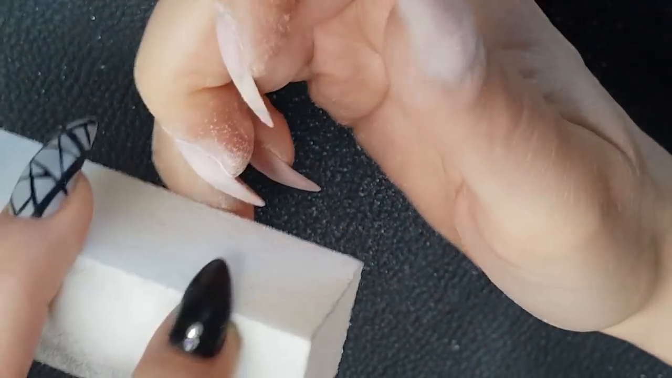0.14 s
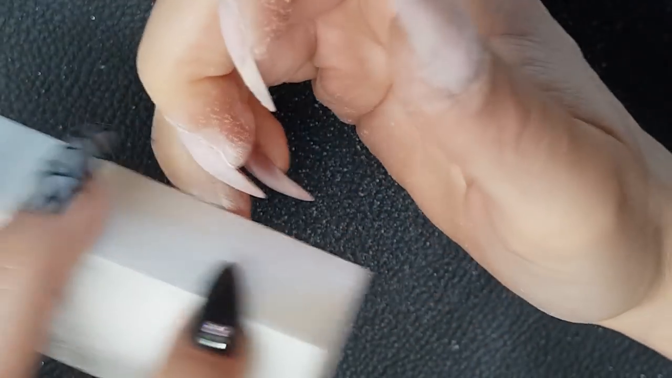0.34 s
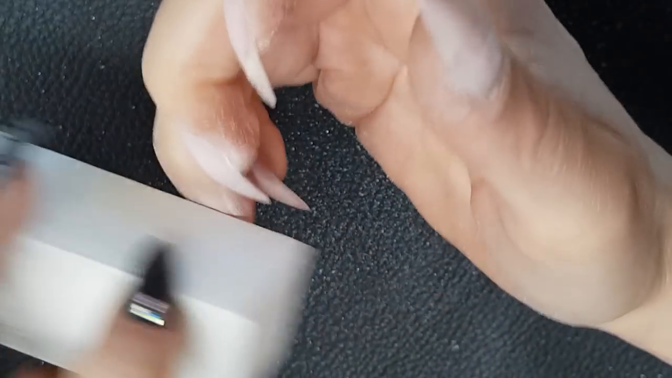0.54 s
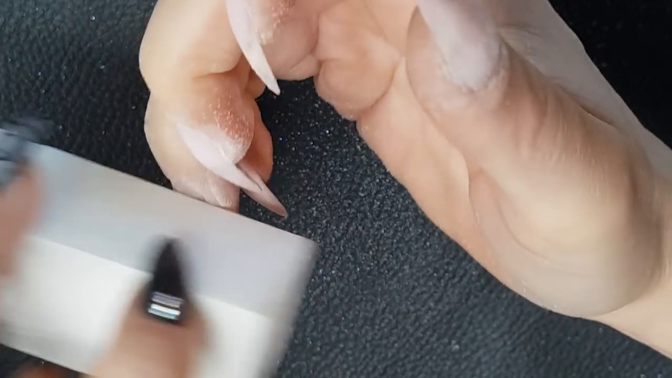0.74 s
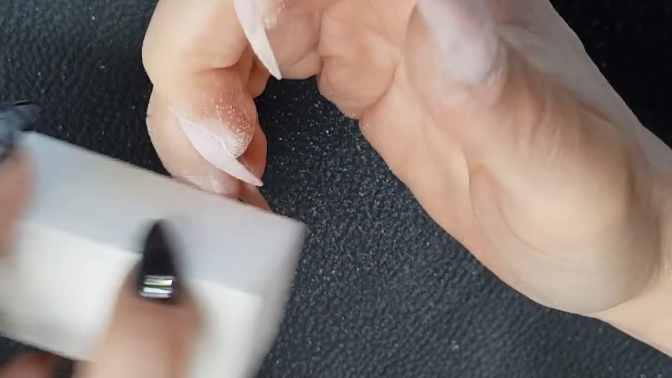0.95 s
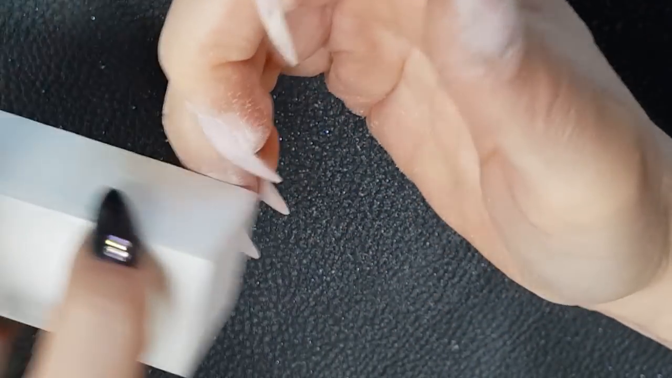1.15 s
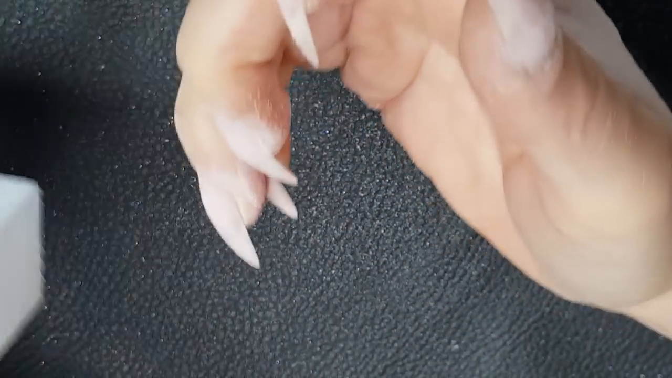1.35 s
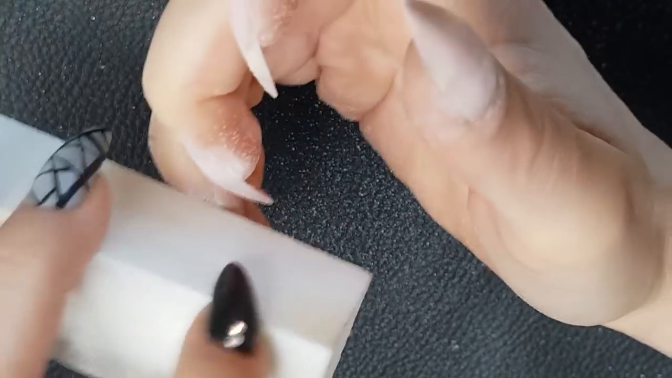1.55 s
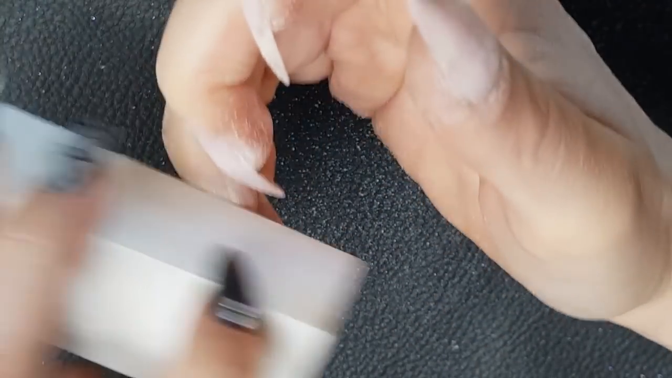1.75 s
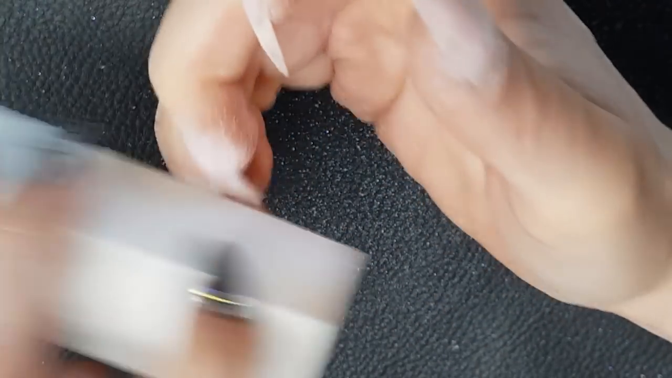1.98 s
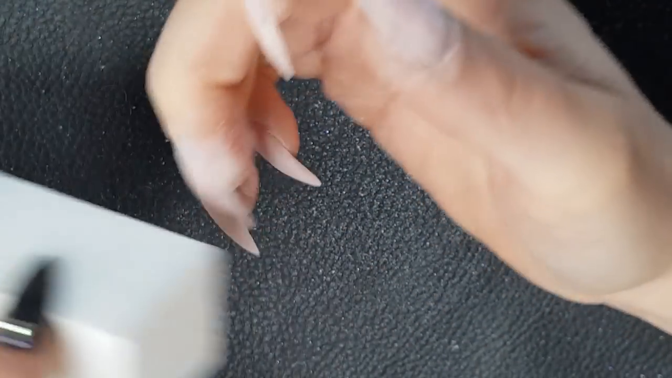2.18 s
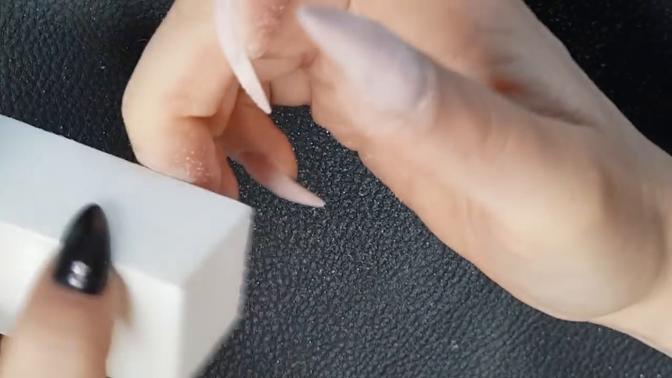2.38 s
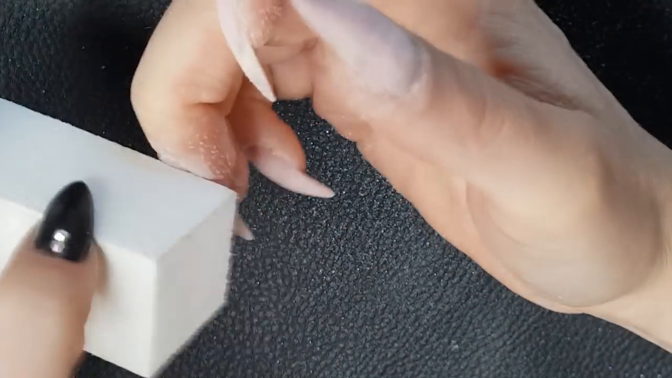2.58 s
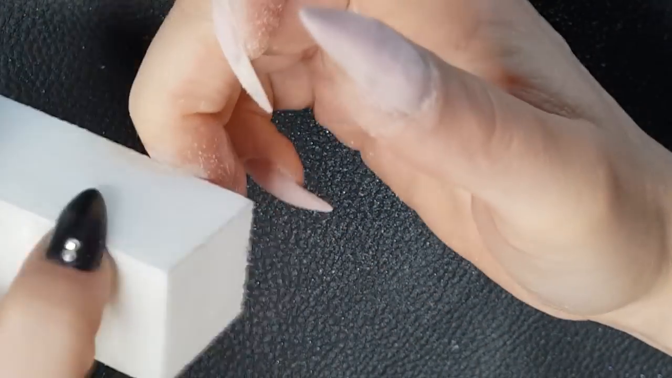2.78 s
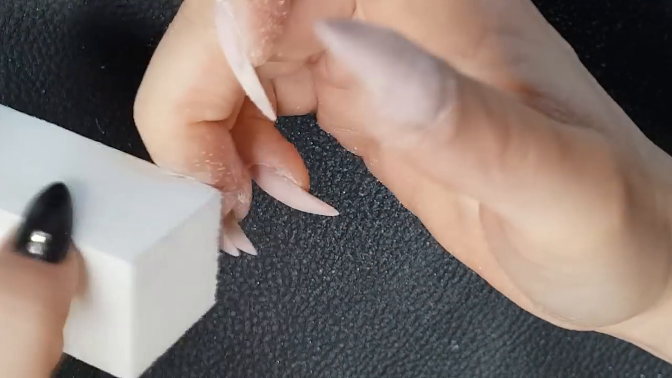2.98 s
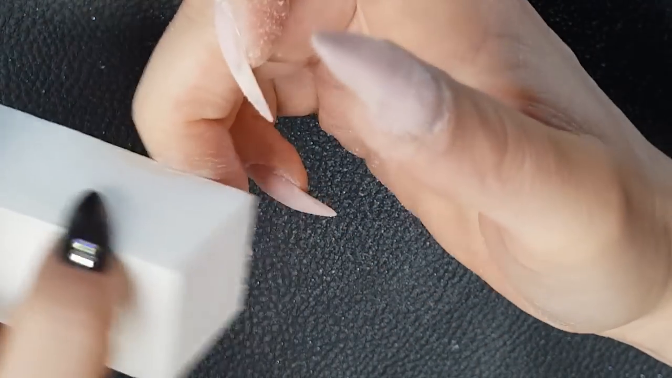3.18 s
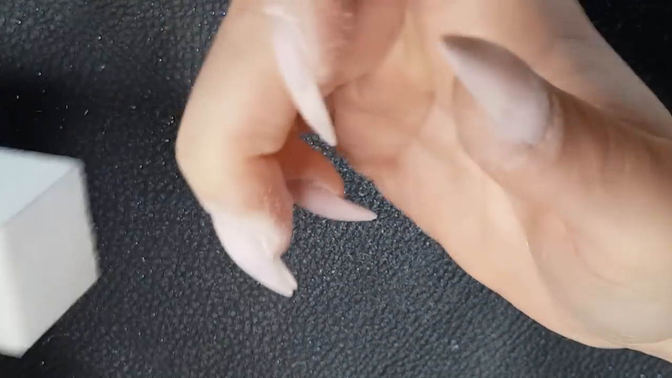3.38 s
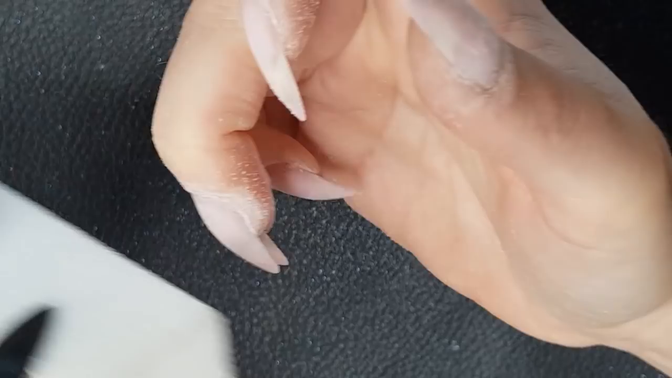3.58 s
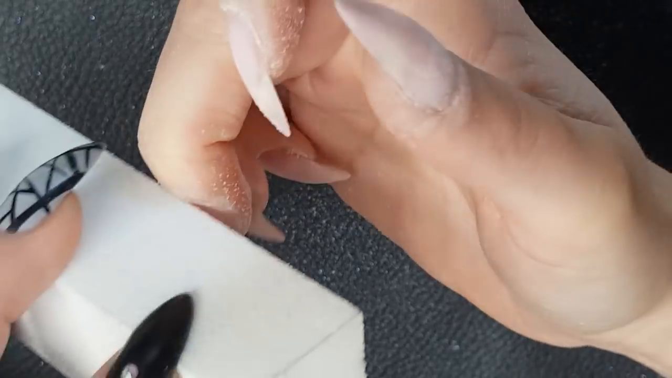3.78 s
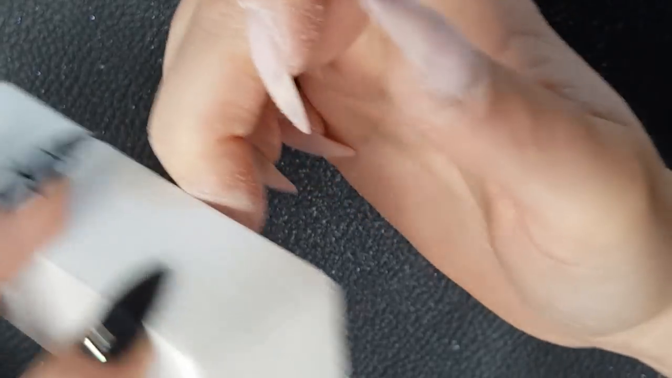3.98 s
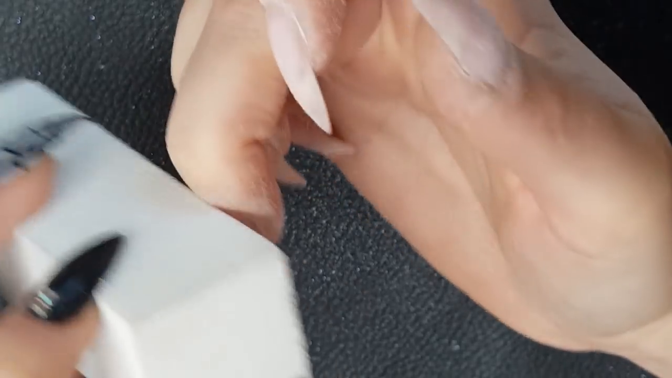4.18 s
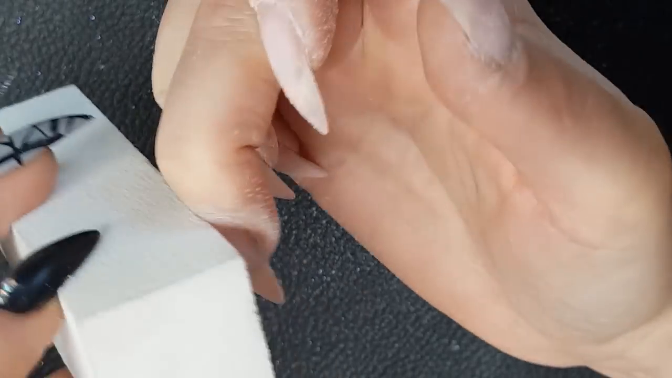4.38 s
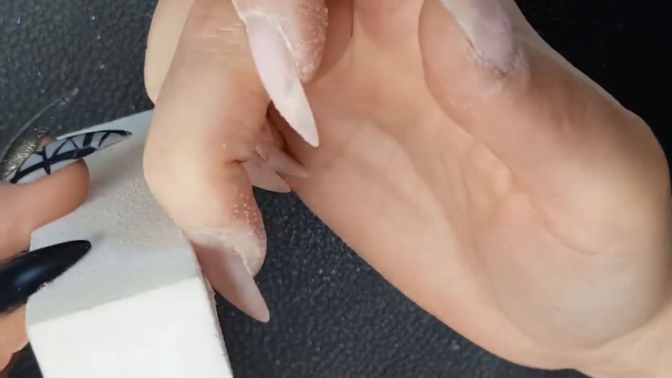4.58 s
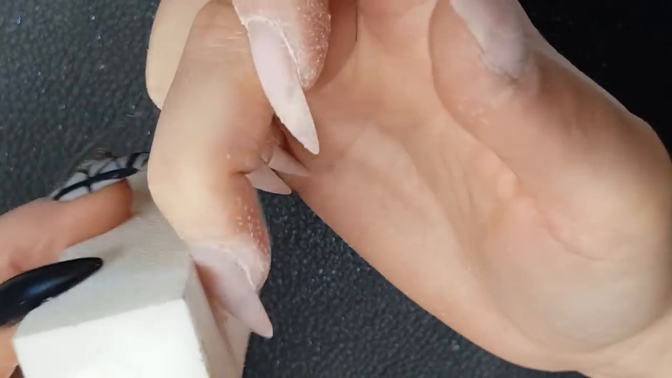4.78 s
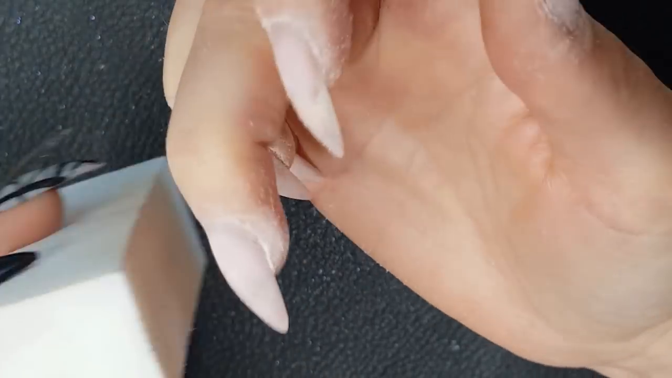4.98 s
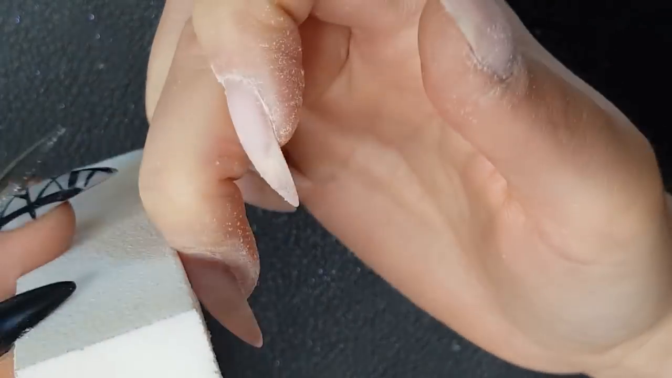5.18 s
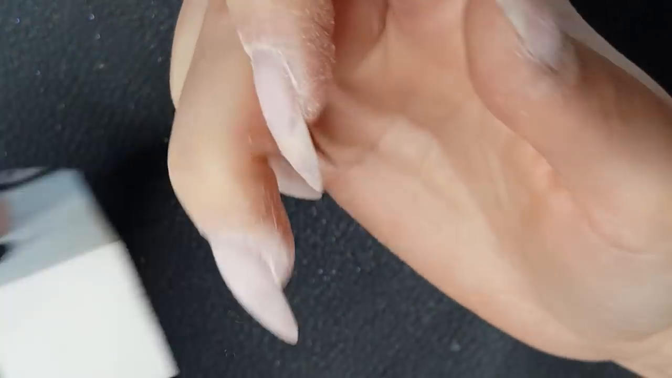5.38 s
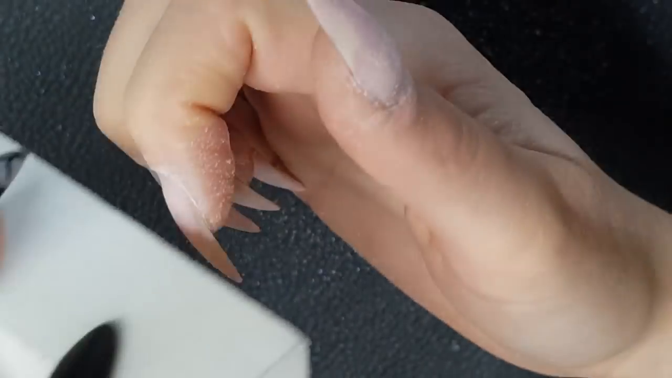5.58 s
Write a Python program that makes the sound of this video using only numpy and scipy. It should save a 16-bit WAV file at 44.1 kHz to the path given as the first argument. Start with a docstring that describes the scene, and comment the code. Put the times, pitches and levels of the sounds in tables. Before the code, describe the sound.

Dry, hissy sanding strokes on fingernails, very near the microphone. A first steady run of rasps stops, a shorter and brighter burst follows, then two more even runs, the last ending in a drawn-out, more nasal scrape. After a gap comes one final rasp and tiny faint brushes. Quiet airy hum fills the small room's pauses.

```python
"""In a small room with ventilation, a gritty foam block is rubbed to and fro over long fingernails, close to a
two-port microphone. Each stroke is a dense rasp: random grains of grit ring the nail, finger and block. Faint
brushes of the block fall between strokes. The room answers with a short tail of echoes. The ventilation is air
noise over a low hum, both made of filtered noise; the background level wavers, air and hum together."""
import sys
import numpy as np
from scipy import signal
from scipy.fft import rfft, irfft
from scipy.io import wavfile
from scipy.ndimage import uniform_filter1d

SR = 44100
rng = np.random.default_rng(int(sys.argv[2]) if len(sys.argv) > 2 else 0)


def inscribe(sig):
    """Save sig as 16-bit PCM at rate SR to the path in sys.argv[1].

    A 1-D sig is mono; a 2-D sig holds one channel per row.
    Samples are clipped to [-1, 1] before scaling.
    """
    pcm = np.round(np.clip(np.atleast_2d(sig).T, -1, 1) * 32767)
    wavfile.write(sys.argv[1], SR, pcm.astype(np.int16))


N = 248600  # length of the scene in samples

# Ring widths below are taken where the power has dropped to a quarter.
# Air noise colour: (frequency [Hz], relative level per Hz [dB])
AIR_COLOUR = [(30, -74), (100, -24), (165, -19), (330, -29.5), (400, -25.5), (480, -16), (632, -18.5),
              (1160, -23.5), (1350, -33.5), (1600, -34), (2480, -41), (4910, -46), (12300, -53.5),
              (16000, -60)]
# How alike the air noise is left and right: (frequency [Hz], likeness [0 to 1])
AIR_LIKENESS = [(60, 0.63), (180, 1), (550, 0.92), (1650, 0.24), (4970, 0.28), (15000, 0.36)]
# Resonances of the duct: (frequency [Hz], width [Hz], relative power [dB])
DUCT_RINGS = [(234.1, 20.5, 1), (273.1, 65.4, -2), (170.5, 28, -15), (456.8, 9.7, -12), (543, 91, -12)]
# Background level over time: (time [s], hum level [dB])
BACKGROUND_LEVEL = [(0.0, -55.5), (0.03, -58), (3.56, -56.5), (3.86, -64.5), (4.09, -56), (5.0, -54.5),
                    (5.1, -61), (5.6, -57), (5.63, -63)]
# Light brushes against skin or nail: (time [s], length [s], level [dB], ring [Hz], ring width [Hz])
BRUSH_EVENTS = [(0.021, 0.066, -81, 3200, 900), (0.159, 0.016, -78, 4830, 1200),
                (1.579, 0.058, -67, 5500, 905), (1.592, 0.049, -77, 7600, 400),
                (5.195, 0.048, -79.5, 3460, 1500), (5.525, 0.0074, -68, 8810, 12000),
                (5.536, 0.018, -74, 9460, 6060), (5.551, 0.038, -79, 6000, 8050)]
# How alike the rasp is left and right: (frequency [Hz], likeness [0 to 1])
RASP_LIKENESS = [(700, 0.95), (2000, 0.96), (3500, 0.75), (6000, 0.56), (9000, 0.43), (15000, 0.65)]
# Dying away of the early room echoes: (frequency [Hz], time to fall 60 dB [s])
ROOM_DECAY = [(700, 0.17), (2000, 0.21), (4000, 0.24), (8000, 0.14), (15000, 0.15)]
# Strokes: (time [s], length [s], hiss level midway [dB], swell from early to late [dB],
#   arch of the middle over the ends [dB], hiss tilt [dB per octave, roughly],
#   nail tip ring [dB], finger ring [dB], block thud [dB]); the last three are relative to the hiss
STROKE_EVENTS = [(0.276, 0.056, -44.5, -2.5, 7, -0.5, -3, -4.5, -23.5),
                 (0.374, 0.052, -42.5, -1, 0, -2, -9.5, -3.5, -40),
                 (0.471, 0.086, -37, -8, 3.2, 2, -1, -7.5, -21),
                 (0.581, 0.076, -40, -5.5, 3, 1, -4, 0, -19),
                 (0.687, 0.053, -37, -3.5, 2, -1, -11, -4.5, -23),
                 (0.786, 0.055, -42, -6.5, 4, 0, -8, -3.5, -20),
                 (0.876, 0.058, -36, -1, 1.5, 1, -6.5, -7, -22),
                 (0.974, 0.044, -42.5, -1, 0.1, 0, -4, -4, -18.5),
                 (1.074, 0.077, -38, 4.5, 2.8, -1, -3.5, -8.5, -22),
                 (1.19, 0.032, -39, -13.5, 11, 0, -0.5, -5, -19),
                 (1.284, 0.038, -37.5, 5, 3.5, -11.5, -9, -12, -19.5),
                 (1.644, 0.1, -41.5, 2, 7.5, -1, -19, -11, -24.5),
                 (1.769, 0.073, -38, -4, 5, 6.5, -10, -3.5, -22.5),
                 (1.868, 0.07, -35.5, -6, 3.5, 5, -9.5, -8.5, -20.5),
                 (1.967, 0.045, -37, -2, 0, 8, -10, -13, -30),
                 (2.036, 0.051, -33, 1.5, 0, 1, -12, -10.5, -22.5),
                 (2.383, 0.06, -40.5, -2.5, 6.5, 0, -9.5, -5.5, -33),
                 (2.484, 0.056, -41, -1.5, 3.5, -3.5, -20, -2.5, -25),
                 (2.573, 0.064, -40.5, -1.5, -1, -4, -9, -4.5, -24),
                 (2.675, 0.086, -44.5, -19, 2, -3.5, -10.5, -4, -20),
                 (2.78, 0.057, -39.5, 3, 1.5, -2, -7.5, -7.5, -24),
                 (2.882, 0.046, -45.5, -6.5, 0.9, -3.5, -14, -4, -15),
                 (2.968, 0.071, -39, -3.5, 5.5, 0, -9, -6, -19),
                 (3.072, 0.049, -40.5, -7.5, 1, -2.5, -9.5, -5, -16.5),
                 (3.165, 0.049, -42, -2.5, 2, -0.5, -7.5, -14, -21),
                 (3.266, 0.021, -42, 3.5, 9.5, 5, -10.5, -15.5, -16.5),
                 (3.333, 0.045, -38.5, 7, -2.2, -3, -9.5, -5.5, -14),
                 (3.901, 0.075, -43, -3, 3.5, -4, -7, -7.5, -23.5),
                 (4.017, 0.051, -42, -4, 2.5, 0, -15, -2.5, -33),
                 (4.103, 0.074, -39.5, -1, 1, -2.5, -6.5, -4.5, -27),
                 (4.219, 0.076, -40.5, -1, 2.5, -2, -4.5, -11, -36.5),
                 (4.331, 0.076, -38.5, 0.5, 1.5, 0, -4.5, -9.5, -27),
                 (4.462, 0.056, -37.5, -3, 1, -1.5, -3, -6.5, -39.5),
                 (4.57, 0.073, -39, -0.5, 1.2, -3.5, -1, -3.5, -26),
                 (4.686, 0.057, -38, -4, 1, -3, -2.5, -4.5, -18.5),
                 (4.791, 0.15, -38.5, -7.5, 3, -7.5, 3.5, 0.5, -19.5),
                 (5.291, 0.071, -40, 7, 1.9, -3, 1.5, -2.5, -25)]
# How the block sits on the hand in each bout of strokes: (start [s], middle nail tip ring [Hz],
#   tip ring width [Hz], finger ring [Hz], growth of tip, finger and thud through the stroke [dB],
#   nail plate ring at -40 dB hiss [dB], block thud [Hz], left over right at -40 dB hiss [dB])
BLOCK_BOUTS = [(0.2, 2950, 800, 2200, 6.5, -0.5, 1220, 1.5), (1.6, 2870, 764, 2100, 6, -1, 1380, 0.6),
               (2.3, 2980, 830, 2230, 4, -2, 1190, 1.7), (3.8, 3340, 940, 2096, 3.5, -1.5, 1010, 1.4),
               (4.75, 3350, 725, 2010, 7, -0.5, 870, 0.5), (5.2, 3390, 810, 2020, 2, -0.5, 870, 1)]
# Hiss colour before bumps and tilt: (frequency [Hz], relative level per Hz [dB])
HISS_COLOUR = [(3240, -31), (5500, -11.5), (6850, -4), (8410, -1.5), (11500, -2), (13200, -2),
               (14800, -4.5), (16000, -12.5)]
# Bumps on the hiss: (frequency [Hz], width [Hz], height [dB]); here width is between the 1/e points of the bump
HISS_BUMPS = [(8100, 440, 0.5), (10420, 1400, 2), (12700, 810, 0)]
# Rings of the nail plate: (frequency [Hz], width [Hz], power weight)
PLATE_RINGS = [(4960, 2360, 0.55), (5020, 600, 0.092), (3800, 770, 0.11)]

AIR_DB = -63.5  # average level in dB
TREBLE_DROP_S = 0.055  # time after which the treble of the room tail drops further
FINGER_WIDTH_HZ, BLOCK_WIDTH_HZ = 900, 810
TIP_SCATTER = 0.015  # typical share by which the tip ring moves from stroke to stroke
PLATE_GROWTH_DB = 0.5  # from start to end of a stroke
# dB per dB of hiss under -40: lighter strokes ring the plate more and sit further left
LIGHT_PLATE, LIGHT_PAN = 0.66, 0.15
RISE_DB_PER_MS = 3.5
# a short stroke that starts soon after its bout does lands more softly
FIRST_S, FIRST_RISE_DB_PER_MS = 0.11, 2
FALL_S = 0.003  # time per 20 dB of fall after a stroke
EDGE_HZ = 15780  # upper edge of the treble


def gain_of(db):
    """Turn dB into an amplitude factor; twice the dB gives a power factor."""
    return 10 ** (np.asarray(db) / 20)


def evened(x):
    """Scale to an average power of 1."""
    return x / np.sqrt(np.mean(x ** 2) + 1e-20)


def read(points, hz):
    """Read a table between its points, along a log frequency scale."""
    f, value = np.transpose(points)
    return np.interp(np.log(hz + 1), np.log(f + 1), value)


def add(mix, s, sound):
    """Mix a sound in at its time, cutting what runs past the end."""
    part = mix[:, round(s * SR):][:, :sound.shape[1]]
    part += sound[:, :part.shape[1]]


def ring(hz, centre_hz, width_hz):
    """Power of a steep resonance over frequency, total 1."""
    power = 1 / (1 + (2 * (hz - centre_hz) / width_hz) ** 2) ** 2
    return power / power.sum()


def paired(a, b, same):
    """Make left and right spectra whose likeness is given per frequency."""
    same = np.clip(same, 0, 1)
    return np.array([a, same * a + np.sqrt(1 - same ** 2) * b])


def ventilation():
    """Air noise above a low hum; the hum is noise shaped by duct resonances and a rumble."""
    hz = np.fft.rfftfreq(N, 1 / SR)
    air_a, air_b, hum_a, hum_b = rfft(rng.standard_normal((4, N)))
    likeness = read(AIR_LIKENESS, hz)
    colour_db = read(AIR_COLOUR, hz)
    above = 1 / (1 + (330 / (hz + 1)) ** 8)  # keeps the part above about 330 Hz
    air = irfft(paired(air_a, air_b, likeness) * gain_of(colour_db) * above, N)
    duct = sum(gain_of(2 * db) * ring(hz, f, w) for f, w, db in DUCT_RINGS)
    rumble = 0.38 * gain_of(2 * colour_db) * (1 - above)
    hum = irfft(paired(hum_a, hum_b, likeness) * np.sqrt(duct / duct.max() + rumble), N)
    hum_db = np.interp(np.arange(N) / SR, *np.transpose(BACKGROUND_LEVEL))
    change_db = hum_db - hum_db.mean()  # the air noise follows the same level
    return gain_of(AIR_DB + change_db) * evened(air) + gain_of(hum_db) * evened(hum)


def grit(size, per_s=14000, spread_db=-1.0, catch_db=1.0):
    """Two streams of grains that catch and slip at random, some weaker; the grip wavers over milliseconds."""
    hit = rng.random((2, size)) < per_s / SR
    weakness = np.minimum(rng.exponential(1, (2, size)), 5)
    sign = rng.choice([-1., 1.], (2, size))
    grip = uniform_filter1d(rng.standard_normal(size), size=60)
    grip = evened(uniform_filter1d(grip, size=60))
    return evened(hit * sign * gain_of(spread_db * weakness + catch_db * grip))


def rasp(layers, patchy_db=2.0, colour_db=1.5):
    """Grit ringing several layers, each a pressure shape over time and a ringing power over frequency."""
    size = len(layers[0][0])
    hz, grains = np.fft.rfftfreq(size, 1 / SR), grit(size)
    spectra = 0
    for k, (shape, power) in enumerate(layers):
        # neighbouring layers stand a quarter turn apart, so their powers add
        spectra = spectra + 1j ** k * rfft(grains * shape) * np.sqrt(power(hz) * len(hz))
    sound = irfft(paired(*spectra, read(RASP_LIKENESS, hz)), size)
    # uneven contact: bright clumps come and go over frequency and time
    z = signal.stft(sound, nperseg=128, noverlap=96)[2]
    patches = uniform_filter1d(rng.standard_normal(z.shape[1:]), size=3, axis=0)
    patches = evened(uniform_filter1d(patches, size=14, axis=1))
    # each contact also has its own colour
    colour = evened(uniform_filter1d(rng.standard_normal(z.shape[1]), size=2))[:, None]
    kept_db = (patchy_db ** 2 + colour_db ** 2) * np.log(10) / 20  # holds the mean power
    z = z * gain_of(patchy_db * patches + colour_db * colour - kept_db)
    return signal.istft(z, nperseg=128, noverlap=96)[1][:, :size]


def brush(s, length, db, ring_hz, width_hz):
    """A faint touch: grit under light pressure rings one resonance over thin hiss."""
    t = np.arange(4096) / SR - .01
    shape = gain_of(db) * np.sin(np.pi * np.clip(t / length, 0, 1))

    def power(hz):
        return ring(hz, ring_hz, width_hz) + 0.12 * ring(hz, 7000, 9000)

    return s - .01, rasp([(shape, power)])


def room(x, treble_db=-7, late_db=-22, late_t60=0.44):
    """Sparse echoes of random sign die by band; treble drops further after TREBLE_DROP_S; a faint long tail."""
    taps = np.zeros((2, SR))
    at = np.arange(100, SR - 20, 20) + rng.integers(0, 20, (2, (SR - 101) // 20))
    np.put_along_axis(taps, at, rng.choice([-1., 1.], at.shape), 1)
    hz, t, z = signal.stft(taps, SR, nperseg=256)
    hz = hz[:, None]
    treble_drop_db = treble_db * np.clip(hz / 6000, 0, 1) * np.clip((t - TREBLE_DROP_S) / 0.024, 0, 1)
    early = gain_of(-60 * t / read(ROOM_DECAY, hz) + treble_drop_db)
    late = gain_of(late_db - 60 * t / late_t60) / (1 + hz / 6000)
    tail = signal.istft(z * (early + late), SR, nperseg=256)[1]
    return signal.fftconvolve(x, tail / np.linalg.norm(tail[0]), axes=1)[:, :N]


def stroke(s, length, hiss_db, swell_db, arch_db, tilt_db, tip_db, finger_db, block_db):
    """The block sweeps the nail and stops short; the rings shift weight as the contact moves."""
    bout = [b for b in BLOCK_BOUTS if b[0] < s][-1]
    bout_s, tip_hz, tip_width_hz, finger_hz, low_growth_db, plate_db, block_hz, pan_db = bout
    light_db = -40 - hiss_db
    tip_hz *= 1 + TIP_SCATTER * rng.standard_normal()
    plate_db += LIGHT_PLATE * light_db
    pan_db += LIGHT_PAN * light_db

    # the level: a steep rise, an arch along the stroke, a steep fall
    t = np.arange(8192) / SR - .03
    early_db, late_db = hiss_db - arch_db - swell_db / 2, hiss_db - arch_db + swell_db / 2
    level_db = np.interp(t, length * np.array([0, 1 / 6, 3 / 6, 5 / 6, 1]),
                         [early_db - 4.5, early_db, hiss_db, late_db, late_db - 7.5])
    soft = s - bout_s < FIRST_S and length < FIRST_S
    rise_db = FIRST_RISE_DB_PER_MS if soft else RISE_DB_PER_MS
    level_db -= rise_db * np.maximum(-t * 1000, 0)
    level_db -= 20 * np.maximum((t - length) / FALL_S, 0)
    along = np.clip(t / length, 0, 1) - .5  # -0.5 at the start, 0.5 at the end

    def hiss(hz):
        bumps_db = sum(db * np.exp(-(2 * (hz - f) / w) ** 2) for f, w, db in HISS_BUMPS)
        tilted_db = tilt_db * np.log2(hz / 10000 + 0.085)
        power = gain_of(2 * (read(HISS_COLOUR, hz) + bumps_db + tilted_db))
        power = power * (hz > HISS_COLOUR[0][0])
        return power / power.sum()

    def plate(hz):
        return sum(weight * ring(hz, f, w) for f, w, weight in PLATE_RINGS)

    def low(hz):
        nail = gain_of(2 * tip_db) * ring(hz, tip_hz, tip_width_hz)
        nail += gain_of(2 * finger_db) * ring(hz, finger_hz, FINGER_WIDTH_HZ)
        radiated = 1 / (1 + (finger_hz / (hz + 1)) ** 14)  # little leaves the nail below the finger ring
        return nail * radiated + gain_of(2 * block_db) * ring(hz, block_hz, BLOCK_WIDTH_HZ)

    layers = [(gain_of(level_db), hiss),
              (gain_of(level_db + plate_db + PLATE_GROWTH_DB * along), plate),
              (gain_of(level_db + low_growth_db * along), low)]
    return s - .03, rasp(layers) * gain_of([[pan_db / 2], [-pan_db / 2]])


def scene():
    """Strokes and brushes, their answer from the room, and the ventilation a little to the left."""
    hand = np.zeros((2, N))
    for row in STROKE_EVENTS:
        add(hand, *stroke(*row))
    for row in BRUSH_EVENTS:
        add(hand, *brush(*row))
    # small bodies radiate no bass
    hand = signal.sosfilt(signal.butter(2, 500, "highpass", fs=SR, output="sos"), hand)
    return hand + gain_of(-9.0) * room(hand) + ventilation() * gain_of([[.3], [-.3]])


def record(dry):
    """A steep low-pass filter removes the treble above the edge."""
    lowpass = signal.firwin(511, EDGE_HZ, window=("kaiser", 9), fs=SR)
    return signal.oaconvolve(dry, lowpass[None], "same")


dry = scene()
out = record(dry)
inscribe(out)
```